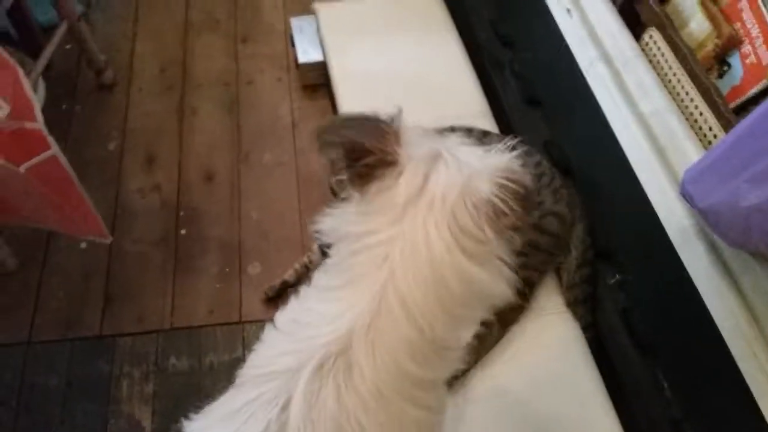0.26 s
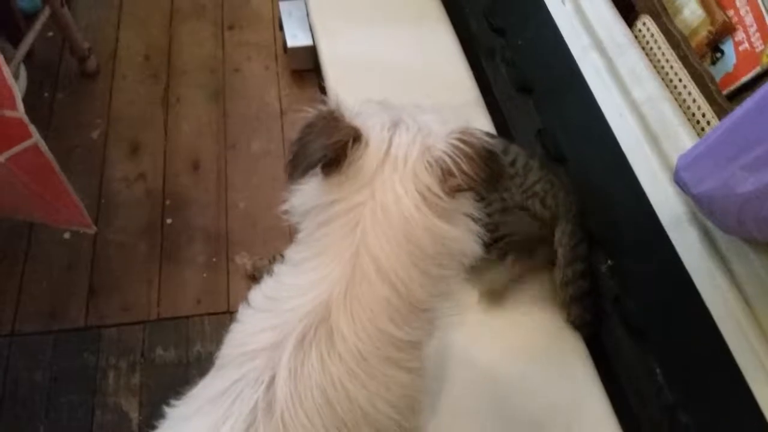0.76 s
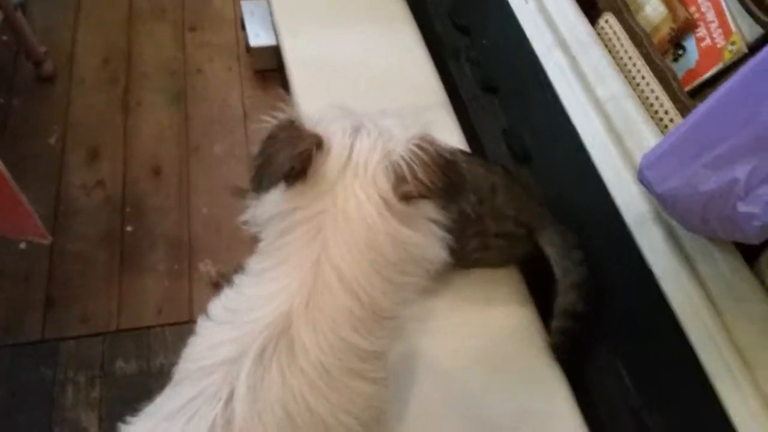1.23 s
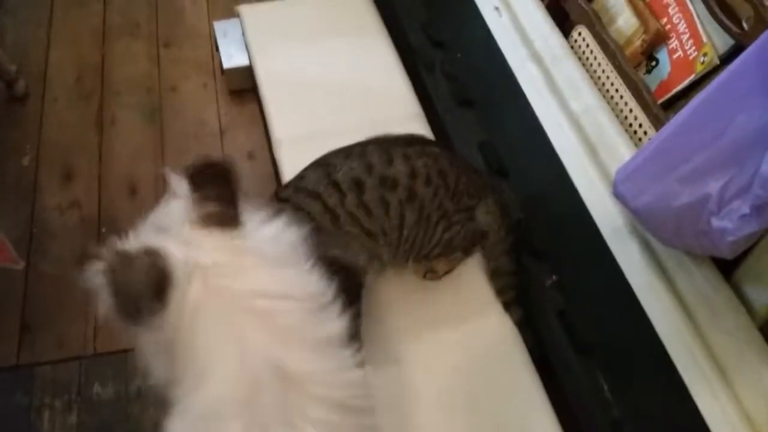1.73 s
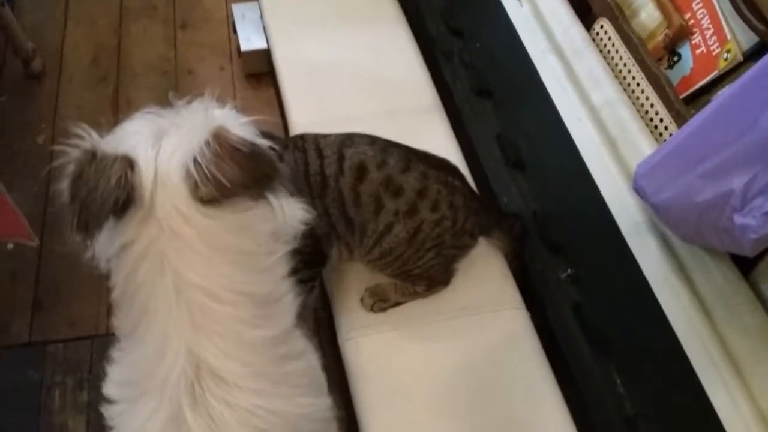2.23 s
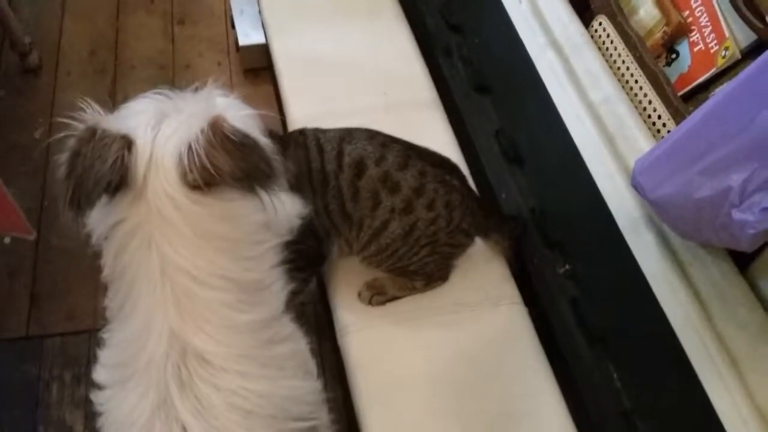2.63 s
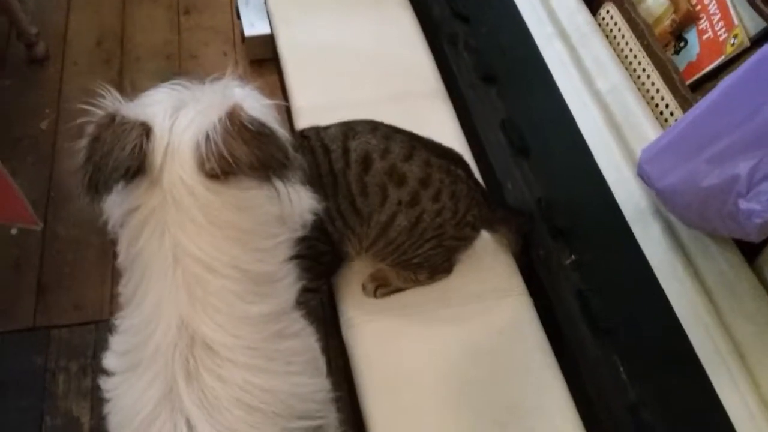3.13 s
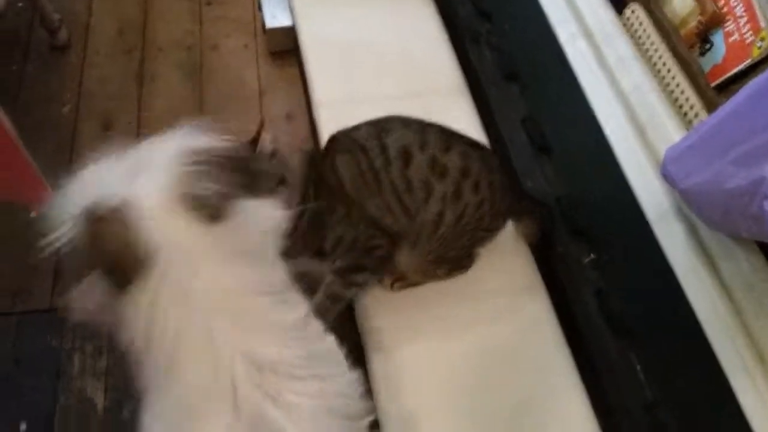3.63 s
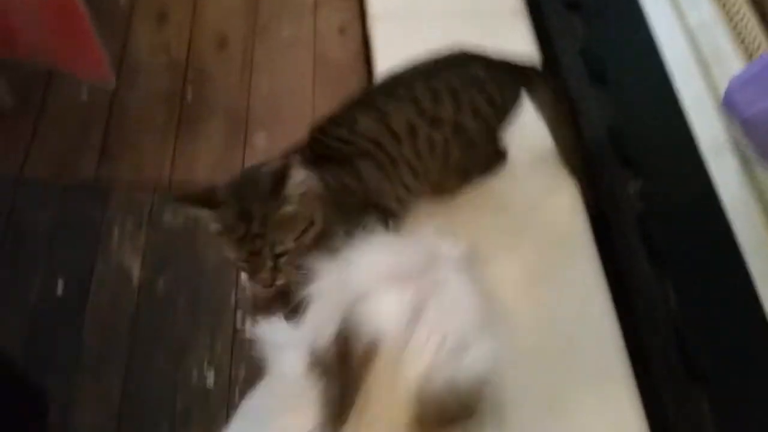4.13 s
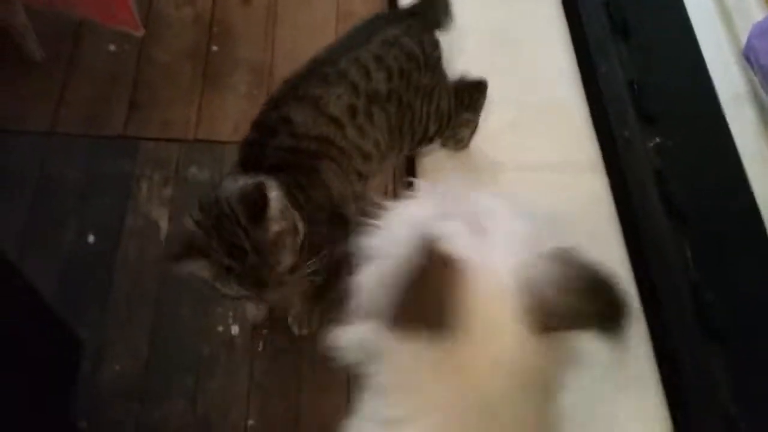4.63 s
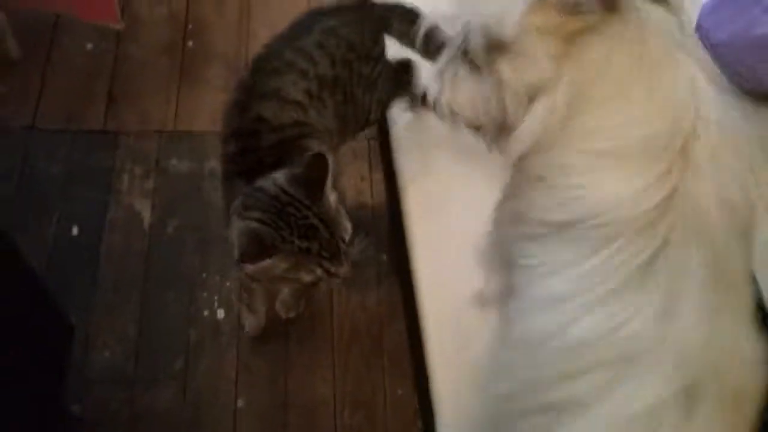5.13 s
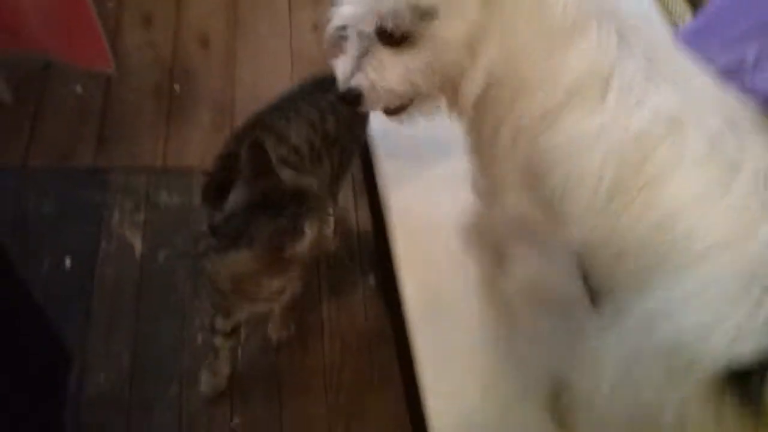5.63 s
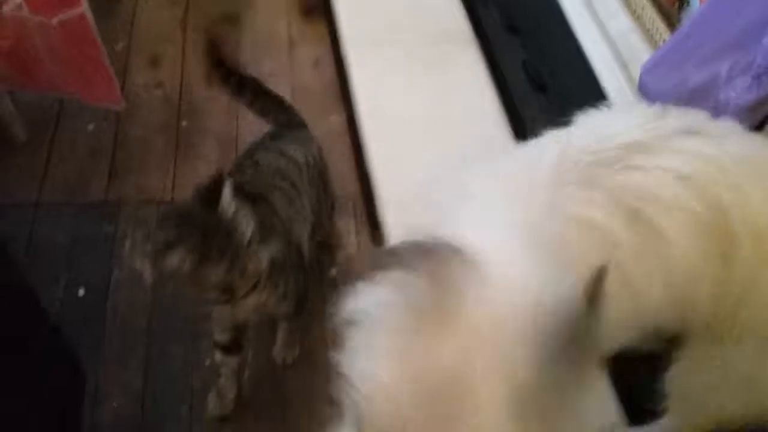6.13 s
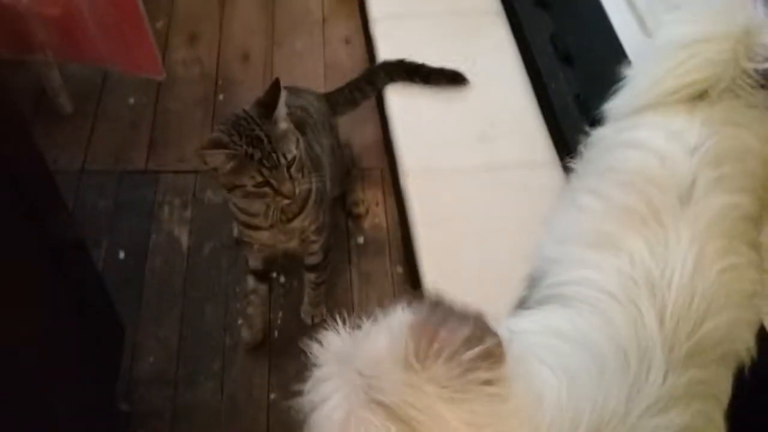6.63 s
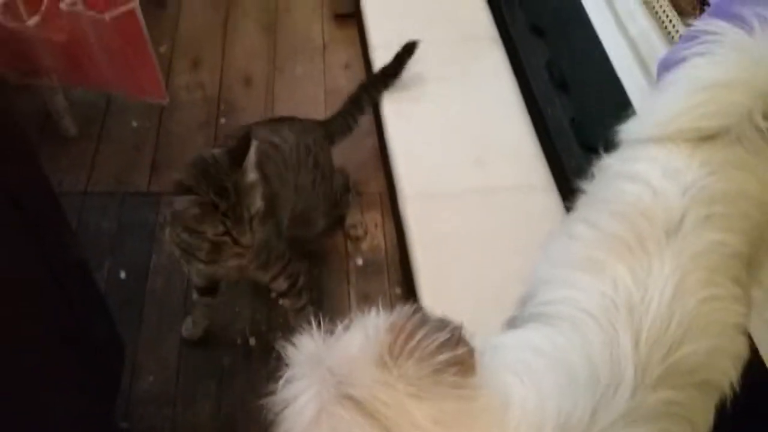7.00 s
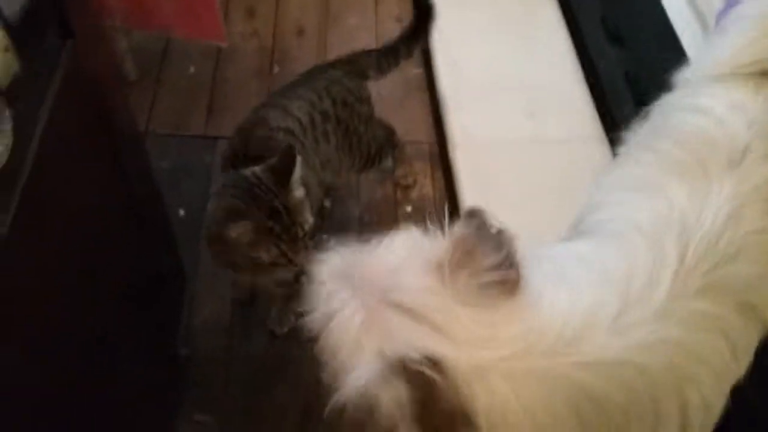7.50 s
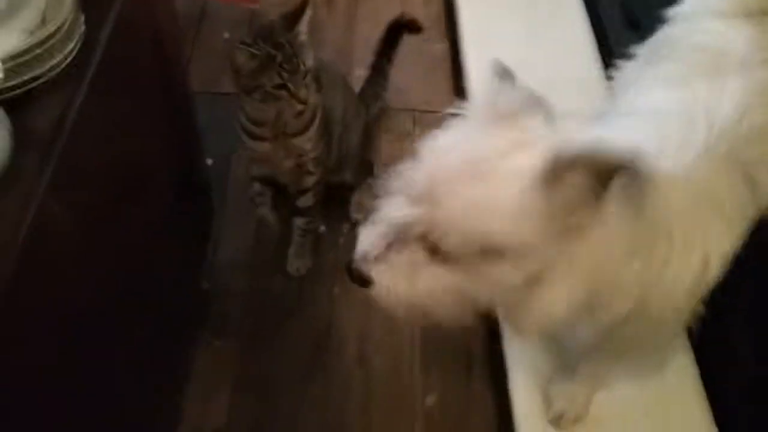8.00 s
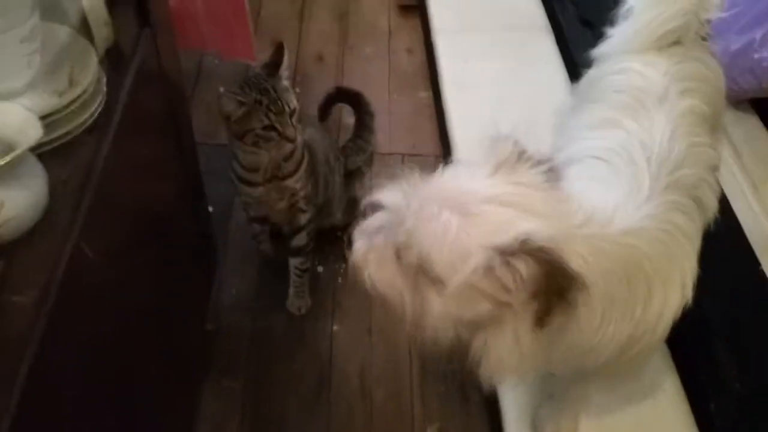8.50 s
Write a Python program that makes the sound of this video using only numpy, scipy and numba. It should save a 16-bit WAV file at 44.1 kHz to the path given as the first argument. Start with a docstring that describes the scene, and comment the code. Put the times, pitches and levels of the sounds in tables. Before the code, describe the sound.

A cat and a small dog tussle on a wooden floor in a small, slightly echoing room. Fur rustles faintly and claws tick. The cat gives a short raspy mew, paws thump the boards, and a longer clear yowl follows. The dog snuffles quickly amid more thumps and one heavy landing. Then a very loud, brief shriek from the cat makes the close microphone crackle, and the last thumps sound quieter.

```python
"""A cat and a small dog tussle on a wooden floor in a small, live room, with a phone held just above them.
First fur rubs, claws tick and the dog snuffles. The cat mews at 1.2 s, and paws thump the boards.
At 3.3 s the cat yowls; then a paw raps a hollow ledge, and the heaviest landing comes at 6.2 s.
At 7.6 s the cat shrieks. This overloads the phone, which crackles and then holds its gain down,
so the last thumps and a final snuffle sound quieter."""
import sys
import numpy as np
from scipy import signal
from scipy.fft import rfft, irfft, next_fast_len
from scipy.io import wavfile
from scipy.ndimage import uniform_filter1d, minimum_filter1d
from numba import njit

SR = 44100
rng = np.random.default_rng(int(sys.argv[2]) if len(sys.argv) > 2 else 0)


def dump_mix(stems):
    """Bounce the given channels to the path in sys.argv[1] as a 16-bit WAV at rate SR."""
    frames = np.atleast_2d(stems).T  # one column per channel
    limited = np.clip(frames, -1, 1)  # hard clip at full scale
    pcm = np.round(limited * 32767).astype(np.int16)
    wavfile.write(sys.argv[1], SR, pcm)


N = 386316
T = np.arange(N) / SR


# The cat's two calls. Each row: time in seconds, pitch in Hz, mouth resonance in Hz.
MEW_PATH = [(1.24, 660, 2620), (1.285, 640, 2000), (1.325, 576, 1830), (1.362, 604, 2150),
            (1.41, 508, 1960), (1.47, 485, 1940)]
YOWL_PATH = [(3.315, 600, 1920), (3.44, 633, 1920), (3.51, 618, 1830), (3.533, 582, 1740), (3.6, 570, 1720),
             (3.69, 531, 1540), (3.77, 544, 1590), (3.84, 563, 1970), (3.94, 534, 1920), (4.02, 563, 2000),
             (4.07, 534, 1980), (4.24, 540, 2120)]

def cat():
    """The cat complains: a short raspy mew, then a long clear yowl."""
    mew = meow(MEW_PATH, db=-37, swell_s=.18, swell_db=15, release_s=.04, release_db=11,
               bright_db=-5, opens_db=3, jitter=.012, rasp_db=-10)
    yowl = meow(YOWL_PATH, db=-35.5, swell_s=.2, swell_db=8.5, release_s=.09, release_db=18,
                bright_db=2, opens_db=9, jitter=.0046, rasp_db=-25)
    return room(mew + yowl, wet_db=0, lag_s=.00013)


# The resonances of the cat's throat. Each row: centre in Hz, width in Hz, level in dB.
THROAT_RESONANCES = [(560, 260, -18.5), (1100, 280, -7.5), (3050, 600, -23.5), (4400, 900, -37),
                     (6100, 750, -12), (7000, 500, -23)]

def meow(path, db, swell_s, swell_db, release_s, release_db, bright_db, opens_db, jitter, rasp_db):
    """The voice's harmonics pass through the throat and the moving mouth; air rasps once a cycle."""
    on = gate(path, fade_s=.022)
    live = on > 0
    t = T[live]
    hz, mouth_hz = (c[live] for c in curves(path))
    effort_db = -swell_db * np.clip(1 - (t - path[0][0]) / swell_s, 0, 1)
    effort_db -= release_db * np.clip(1 - (path[-1][0] - t) / release_s, 0, 1)
    # a wider mouth and a harder push both brighten the voice
    mouth_octaves = np.log2(mouth_hz / 1900).clip(max=.1)
    treble_db = bright_db + 22 * mouth_octaves + .8 * effort_db
    treble_db += opens_db * np.linspace(-1, 0, len(t))  # the jaw drops through the call
    hz = hz * (1 + jitter * wobble(170)[live] + .004 * wobble(30)[live])
    phase = 2 * np.pi * np.cumsum(hz) / SR
    throat = lambda f: sum(undb(level) * resonance(f, centre, width)
                           for centre, width, level in THROAT_RESONANCES)
    lips = lambda f: 1 / (1 + (f / 7600) ** 20)
    tone = np.zeros(len(t))
    for k in range(1, 16):
        f = k * hz
        opening = undb(treble_db * np.clip((f - 2200) / 1500, 0, 1))
        tone += (throat(f) + resonance(f, mouth_hz, 450)) * lips(f) * opening * np.sin(k * phase)
    tone /= np.sqrt(uniform_filter1d(tone ** 2, SR // 100) + 1e-9)  # even out the loudness
    airway = lambda f: (throat(f) + resonance(f, 1400, 600) / 2) * lips(f)
    air = unit(shape(rng.standard_normal(len(t)), airway))
    rasp = undb(rasp_db + treble_db / 2) * air * (1 + np.cos(phase))
    out = np.zeros(N)
    out[live] = (tone + rasp) * undb(db + effort_db)
    return out * on


# The tune of the shriek. Each row: time in seconds, pitch in Hz.
SHRIEK_PATH = [(7.595, 1195), (7.608, 1172), (7.614, 1490), (7.634, 1538), (7.683, 1540), (7.692, 1330),
               (7.706, 832), (7.72, 714)]

def shriek(top_db=9.8, db_per_octave=9, swell_db_per_s=92, break_at_s=7.617, collapse_at_s=7.681):
    """The cat spits air, then a near-pure scream breaks upward, holds and collapses in a rough fall."""
    hz, = curves(SHRIEK_PATH)
    octaves = np.log2(hz / hz.max())
    collapse = np.clip((T - collapse_at_s) / .007, 0, 1)
    db = top_db + db_per_octave * octaves - 14 * collapse
    db += swell_db_per_s * np.minimum(T - collapse_at_s, 0)
    db -= 15 * np.exp(-((T - break_at_s) / .0105) ** 2)  # the voice falters as it breaks
    # the collapse shakes the pitch and adds rasp
    jitter = .0045 + .028 * collapse
    rasp_db = -34 + 27.5 * collapse
    phase = 2 * np.pi * np.cumsum(hz * (1 + jitter * wobble(700))) / SR
    # while the pitch slides, the octave above stands out
    octaves_per_s = abs(np.gradient(octaves)) * SR
    slide = uniform_filter1d(np.minimum(octaves_per_s / 25, 1), SR // 200)
    tone = np.sin(phase) + undb(-11.5 + 10 * slide) * np.sin(2 * phase + 1)
    tone += sum(undb(-29 - 6 * (k - 3)) * np.sin(k * phase) for k in range(3, 7))
    rasp = colour(rng.standard_normal(N), [
        (100, -8), (480, -23), (800, -12.5), (1250, -8), (1900, -7.5), (2800, -5.5),
        (3600, -27), (7200, -23), (8500, -43.5), (15000, -40)])
    start_s, start_hz = SHRIEK_PATH[0]
    spit = rasp * undb(-27) * np.exp(-abs(T - start_s) / .007)
    scream = (tone + undb(rasp_db) * rasp) * undb(db) * gate(SHRIEK_PATH, fade_s=.006)
    # nearby reflections favour the left microphone at the opening pitch and the right at the top
    pan_db = np.interp(hz, [start_hz, hz.max()], [11, -9]) * (1 - collapse)
    return room(scream + spit, wet_db=-2.5, pan_db=pan_db, lag_s=.00016)


# Paws and bodies landing. Each row: start in seconds, level in dB, hardness in dB (more means more knock).
LANDINGS = [(1.238, -57, 18.5), (1.472, -48, 1), (1.58, -52.5, 14.5), (1.78, -27.5, -2), (1.978, -32, 1),
            (2.155, -40, -11), (2.199, -38.5, -5), (2.876, -56, -3), (3.545, -38.5, -3), (3.85, -43.5, 3),
            (3.914, -42, 7), (4.124, -37.5, 1), (4.242, -51, 15), (4.441, -32.5, 2.5), (4.529, -45, -12),
            (4.903, -37.5, 1), (5.609, -51, 13.5), (5.632, -53, 19), (5.981, -44, 8), (6.029, -43, 10),
            (6.197, -21, 5.5), (6.39, -31, 2.5), (6.478, -46, -10), (7.541, -55, 12), (7.876, -38, 4),
            (8.058, -44, 0), (8.189, -42.5, 0), (8.329, -46.5, 7)]
# The notes the floor rings with. Each row: pitch in Hz, level in dB, seconds to fade by 60 dB.
BOARD_NOTES = [(152, -7.5, 0.13), (193.5, -1, 0.11), (215, -2, 0.17), (306, 0, 0.23), (349.8, -3, 0.27),
               (424, -10.5, 0.55), (496, -14, .2), (605.7, -17.5, .22)]
# The tone of the dull thud and of the hard knock. Each row: frequency in Hz, level in dB.
THUD_TONE = [(21, -38), (35, -29), (80, 0), (210, 3.5), (267, -1.5), (403, -7), (463, -12.5), (518, -17.5),
             (700, -18), (910, -63.5), (1540, -120)]
KNOCK_TONE = [(240, -10.5), (400, -11), (819, -12.5), (1210, -20.5), (1690, -25.5), (2350, -34),
              (3500, -37.5), (4550, -62.5), (7700, -120)]

def thumps(ring_db=-13, joist_hz=135):
    """A landing sways the joists (beams under the floor) and rings the boards; a hard one knocks too."""
    out, t = np.zeros(N), T[:SR // 2]
    start_at = lambda x, db: x * undb(db) / np.sqrt(np.mean(x[:SR // 30] ** 2))
    rise = lambda seconds: 1 - np.exp(-t / seconds)
    for s, db, hard_db in LANDINGS:
        noise = rng.standard_normal((2, len(t)))
        thud = colour(noise[0], THUD_TONE)
        low = shape(thud, lambda f: 1 / (1 + (f / joist_hz) ** 8))
        joists = low * fall(t, t60=.19) * rise(.018)
        joist_db = -3 - .5 * hard_db  # soft, heavy landings sway the joists most
        boards = unit(thud - low) * fall(t, t60=.091) + undb(ring_db) * ring(BOARD_NOTES, t)
        boards *= rise(.003)
        knock = colour(noise[1], KNOCK_TONE) * fall(t, t60=.085) * rise(.002)
        landing = start_at(joists, joist_db) + start_at(boards, 0) + undb(hard_db + 2) * knock
        add(out, s, undb(db) * landing)
    return room(out, wet_db=.5, pan_db=3.5)


# The notes the ledge rings with. Each row: pitch in Hz, level in dB, seconds to fade by 60 dB.
LEDGE_NOTES = [(226, 0, .13), (275, -6, .07), (888, -2, .06), (1010, -4, .04), (1290, -6, .035),
               (2110, -11, .04), (2420, -11, .03), (3150, -12, .03)]

def ledge_rap(start_s=4.8145, db=-27):
    """A paw raps a hollow wooden ledge once, and it rings briefly."""
    out = np.zeros(N)
    add(out, start_s, undb(db) * ring(LEDGE_NOTES, T[:SR // 2], scatter_db=1))
    return room(out, wet_db=-11)


# Claws striking. Each row: start in seconds, level in dB, treble tilt in dB per tenfold frequency.
CLAW_STRIKES = [(0.8686, -45.5, -16), (1.1557, -49.5, -20), (1.5807, -37, -14), (1.784, -37.5, 13),
                (1.8806, -43, 14), (3.9647, -33, -6), (4.131, -27.5, 16), (4.2413, -30, 10),
                (4.3519, -23.5, 12), (4.815, -28.5, -12.5), (4.9677, -36, -3), (5.9854, -31, -22),
                (6.3228, -29, 10)]
# The tone of a tick. Each row: frequency in Hz, level in dB.
CLAW_TONE = [(410, -26), (700, 2), (1320, -6), (2110, -1), (2630, -6), (3630, -5.5), (4470, -12.5),
             (6680, -6), (8320, -25), (15500, -26.5)]

def claws(gain_db=2):
    """Each claw strikes with a brief tick of noise, some sharper than others."""
    out, t = np.zeros(N), T[:SR // 8]
    for s, db, tilt_db in CLAW_STRIKES:
        tilted = [(hz, level + tilt_db * np.log10(hz / 2000)) for hz, level in CLAW_TONE]
        tick = colour(rng.standard_normal(len(t)), tilted)
        add(out, s, undb(db + gain_db) * tick * fall(t, t60=.023))
    return room(out, wet_db=.5)


# The dog's breaths; the row at 0.99 s is a soft scuff and the row at 7.09 s a faint whimper, both played the
# same way. Each row: puff time in seconds, puff level in dB, muzzle resonance in Hz, level of the in-breath in
# dB.
BREATHS = [(0.99, -53.5, 1150, -85), (1.72, -53, 850, -75), (4.54, -40.5, 1730, -62),
           (4.71, -51.5, 2150, -76), (4.88, -43, 3320, -68), (5.108, -38, 2070, -47),
           (5.3, -38, 1990, -42.5), (5.526, -40.5, 1880, -47), (5.728, -43.5, 1910, -54),
           (5.962, -44.5, 1590, -70), (6.409, -44.5, 3100, -72), (6.675, -55.5, 3130, -80),
           (6.831, -56.5, 1550, -74), (7.09, -60, 1700, -63), (7.174, -60, 2680, -70),
           (7.33, -68, 1650, -68), (8.75, -58, 2300, -90)]
# The tone of air hissing through the snout. Each row: frequency in Hz, level in dB.
SNOUT_TONE = [(180, -8), (300, -5), (474, -7.5), (884, -5.5), (1370, -5.5), (1970, -17.5), (2440, -4.5),
              (2650, -6), (3490, -10), (5260, -21), (6950, -13.5), (8320, -29), (15000, -31.5)]

def snuffles(gain_db=.3, flutter_db=2, whistle_hz=6900, rise_hz_per_s=4000, intake_lead_s=.045):
    """The dog draws air in with a rising nose whistle, then puffs it out, ringing the muzzle."""
    out, t = np.zeros(N), T[:SR // 2] - .25  # the puff peaks at t = 0
    intake_t = t + intake_lead_s
    swell = lambda t, half_width_s: 1 / np.cosh(2 * t / half_width_s)
    loudest_db = max(row[1] for row in BREATHS)
    for s, puff_db, muzzle_hz, intake_db in BREATHS:
        noise = rng.standard_normal((3, len(t)))
        hiss = undb(.3 * (puff_db - loudest_db)) * colour(noise[0], SNOUT_TONE)  # gentle puffs hiss less
        muzzle = unit(shape(noise[1], lambda f: resonance(f, muzzle_hz, 640)))
        air = hiss + undb(-2.5) * muzzle
        hz = whistle_hz * (1 + .012 * rng.standard_normal()) + rise_hz_per_s * intake_t
        waver = shape(noise[2], lambda f: resonance(f, 0, 330))  # slow noise makes the whistle breathy
        whistle = unit(waver * np.sin(2 * np.pi * np.cumsum(hz) / SR))
        intake = undb(intake_db) * (whistle + undb(-3) * air) * swell(intake_t, .028)
        puff = undb(puff_db) * air * swell(t, .024)
        add(out, s - .25, intake + puff)
    return room(out * undb(gain_db + flutter_db * wobble(150)), wet_db=2)


# Strokes of fur and paw pads. Each row: start in seconds, length in seconds, level in dB.
STROKES = [(.76, .4, -77), (1.41, .3, -66), (1.785, .3, -61), (3.72, .42, -58), (4.135, .27, -51.5),
           (4.52, .24, -62), (4.812, .22, -53.5), (5.13, .4, -61), (5.61, .22, -57), (5.985, .22, -50.5),
           (6.2, .16, -54), (6.51, .13, -57.5), (7.54, .015, -57), (8.325, .07, -66.5)]
# The tone of rubbing fur. Each row: frequency in Hz, level in dB.
FUR_TONE = [(240, -42.5), (400, -10.5), (643, -4), (715, -6.5), (1260, -8.5), (1380, -8.5), (1590, -7),
            (1790, -3.5), (1960, -6), (3680, -18), (5390, -21), (6580, -10), (8400, -25), (15500, -31)]

def rubbing(gain_db=7, grain_db=5, grains_per_s=2500, slip_db=2, sag_db=7):
    """Hairs and pads catch and slip, making dense, uneven grains of sound in little surges."""
    level = np.zeros(N)
    for s, length, db in STROKES:
        t = T - s
        bite = np.clip(t / .012, 0, 1)
        weaken = undb(-sag_db * np.clip(t / length, 0, 1))
        let_go = np.clip(1 + (length - t) / .03, 0, 1)
        level += undb(db) * bite * weaken * let_go
    grains = (rng.random(N) < grains_per_s / SR) * rng.standard_normal(N)
    grains *= undb(grain_db * np.minimum(rng.exponential(size=N), 3))
    return room(colour(grains, FUR_TONE) * level * undb(gain_db + slip_db * wobble(60)), wet_db=6.5)


# The tone of the quiet room. Each row: frequency in Hz, level in dB.
HUSH_TONE = [(15, -45.5), (25, -35.5), (104, 2.5), (160, -13), (188, -4), (340, -18), (378, -19.5),
             (482, -25.5), (666, -23), (919, -25), (1270, -28), (3830, -38), (6730, -41.5), (15500, -40)]

def hush(db=-59.5, waver_db=3):
    """Faint room noise, with a low rumble that wavers."""
    air = colour(rng.standard_normal(N), HUSH_TONE)
    low = shape(air, lambda f: 1 / (1 + (f / 400) ** 4))
    rumble = low * undb(waver_db * wobble(54) - 6)
    return room(air - low + rumble, wet_db=12) * undb(db)


# How long the room echoes. Each row: frequency in Hz, seconds to fade by 60 dB.
ROOM_DECAY = [(100, 0.34), (500, 0.46), (1500, 0.38), (3000, 0.37), (7000, 0.38), (14000, .25)]

def room(x, wet_db, pan_db=0, lag_s=0, alike_hz=420):
    """Two microphones hear the direct sound, then an echo (wet_db louder) alike only in the bass."""
    t = T[:SR * 3 // 4]
    log_hz, log_t60 = np.log(np.transpose(ROOM_DECAY))
    mid, side = rng.standard_normal((2, len(t)))
    apart = lambda f: np.pi / 4 * f ** 2 / (f ** 2 + alike_hz ** 2)
    shared = shape(mid, lambda f: np.cos(apart(f)))
    opposed = shape(side, lambda f: np.sin(apart(f)))
    noise = np.array([shared + opposed, shared - opposed])
    tail = sum(shape(noise, lambda f: np.interp(np.log(f), log_hz, band)) * fall(t, t60)
               for band, t60 in zip(np.eye(len(log_hz)), np.exp(log_t60)))
    tail = unit(tail * np.clip(t / .0024, 0, 1)) / np.sqrt(len(t))
    echo = signal.oaconvolve(x[None], tail, axes=1)[:, :N]
    direct = np.array([x * undb(pan_db / 2), np.roll(x * undb(-pan_db / 2), round(lag_s * SR))])
    return (direct + undb(wet_db) * echo) / np.hypot(1, undb(wet_db))


def undb(db):
    """Turn decibels into a gain."""
    return 10 ** (np.asarray(db) / 20)


def unit(x):
    """Scale to an average (rms) level of 1."""
    return x / np.sqrt(np.mean(x ** 2) + 1e-20)


def curves(rows):
    """Turn each column after the first into a curve in time."""
    s, *columns = np.transpose(rows)
    return [np.interp(T, s, c) for c in columns]


def gate(rows, fade_s):
    """One while a table lasts, with soft ends."""
    return np.clip((T - rows[0][0]) / fade_s, 0, 1) * np.clip((rows[-1][0] - T) / fade_s + 1, 0, 1)


def shape(x, gain_at):
    """Filter by a function of frequency."""
    n = x.shape[-1]
    size = next_fast_len(n)
    return irfft(rfft(x, size) * gain_at(np.fft.rfftfreq(size, 1 / SR) + 1), size)[..., :n]


def colour(x, points):
    """Filter by (Hz, dB) points, then scale to level 1."""
    hz, db = np.transpose(points)
    return unit(shape(x, lambda f: undb(np.interp(np.log(f), np.log(hz), db))))


def resonance(f, hz, width):
    """A gain that peaks at hz and drops steeply on both sides."""
    return 1 / (1 + (2 * (f - hz) / width) ** 2)


def wobble(rate):
    """A smooth random curve of level 1 that turns up to `rate` times a second."""
    k = max(int(SR / rate), 2)
    steps = np.repeat(rng.standard_normal(N // k + 1), k)
    return unit(uniform_filter1d(steps, k)[:N])


def add(track, s, sound):
    """Mix a sound in at s seconds."""
    i = max(int(s * SR), 0)
    track[..., i:i + sound.shape[-1]] += sound[..., :N - i]


def fall(t, t60):
    """Fade by 60 dB in t60 seconds."""
    return np.exp(-np.log(1000) * t / t60)


def ring(notes, t, scatter_db=2):
    """Struck wood rings; each blow lands on another spot and mixes the notes anew."""
    out = np.zeros(len(t))
    for hz, db, t60 in notes:
        gain = undb(db + scatter_db * rng.standard_normal()) * rng.choice([-1, 1])
        detune = 1 + .021 * rng.standard_normal()
        out += gain * fall(t, t60) * np.sin(2 * np.pi * hz * detune * t)
    return out


@njit
def follow(x, attack, release):
    """Track a level, rising at one speed and sinking at another."""
    out, level = np.empty(len(x)), 0.
    for i in range(len(x)):
        level += (x[i] - level) * (attack if x[i] > level else release)
        out[i] = level
    return out


def scene():
    """Both animals and the room."""
    return cat() + shriek() + thumps() + ledge_rap() + claws() + rubbing() + snuffles() + hush()


def record(dry, threshold=.9, attack_s=.036, release_s=4.0, top_hz=15650):
    """The phone turns loud sound down and recovers slowly; a fast limiter then catches the peaks."""
    loudness = follow(abs(dry).max(axis=0), 1 / (attack_s * SR), 1 / (release_s * SR))
    x = dry / np.maximum(loudness / threshold, 1)
    ceiling, hold = np.array([[.98], [1.04]]), SR // 400
    limiter_gain = minimum_filter1d(ceiling / np.maximum(abs(x), ceiling), hold)
    x = x * uniform_filter1d(limiter_gain, hold)
    x = (x + 1) % 2 - 1  # the right channel's peaks pass full scale and wrap round, which crackles
    return signal.sosfilt(signal.ellip(10, .2, 80, top_hz, fs=SR, output="sos"), x)


dry = scene()
out = record(dry)
dump_mix(out)
```